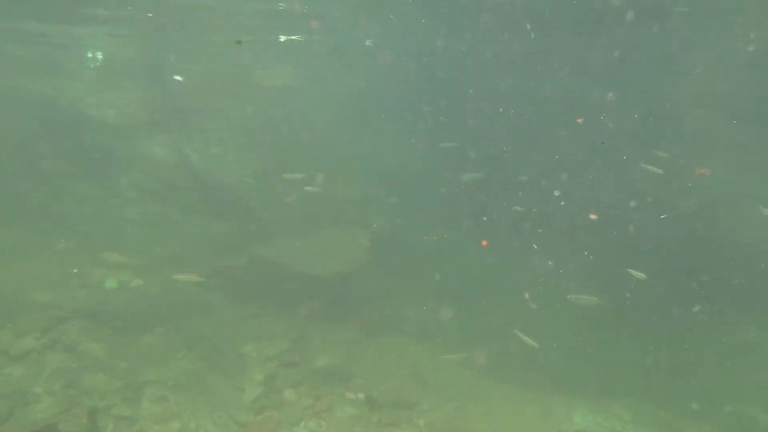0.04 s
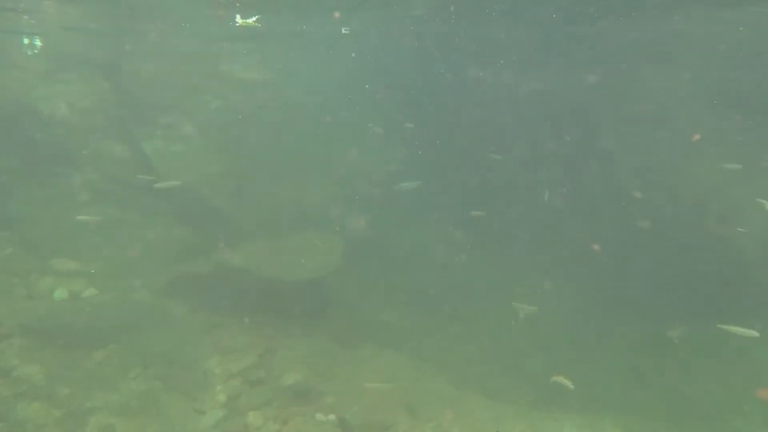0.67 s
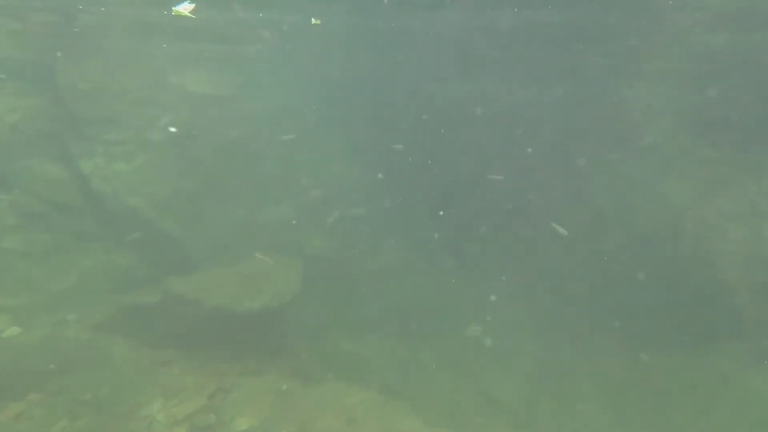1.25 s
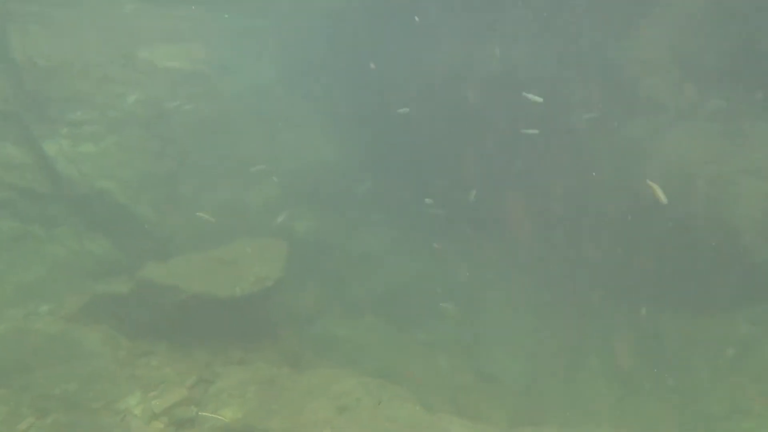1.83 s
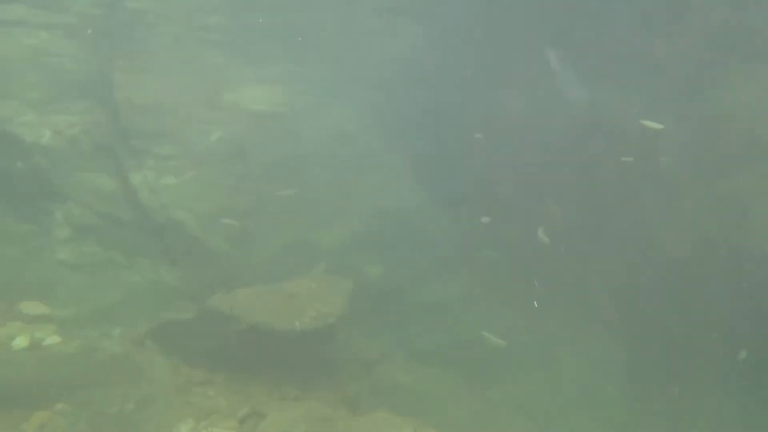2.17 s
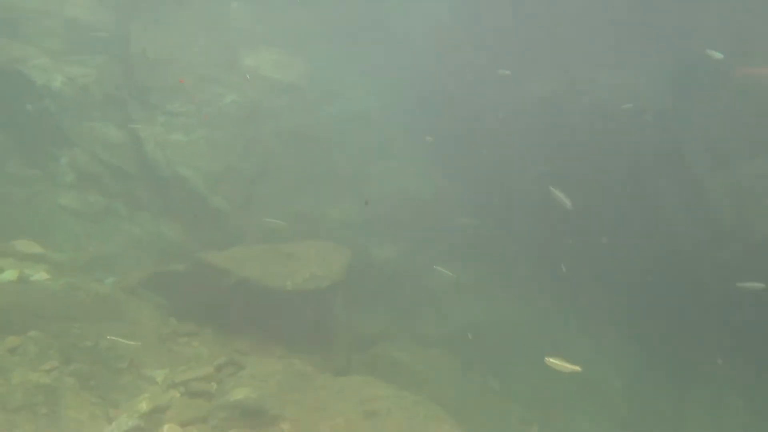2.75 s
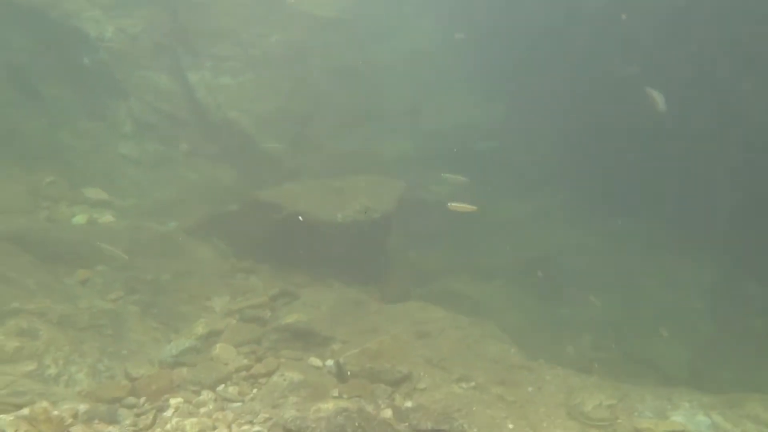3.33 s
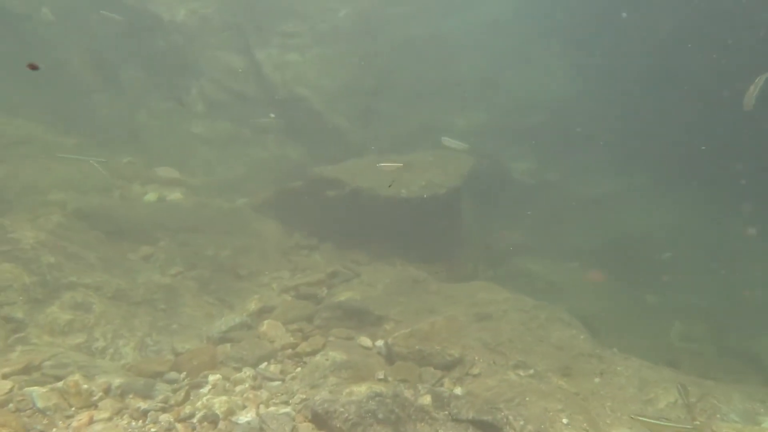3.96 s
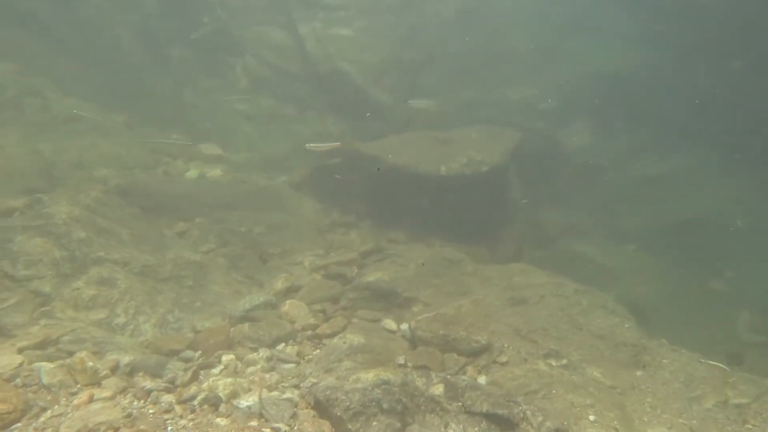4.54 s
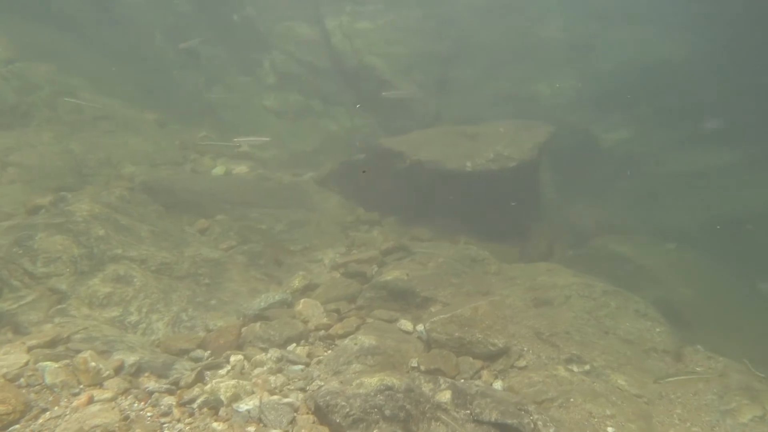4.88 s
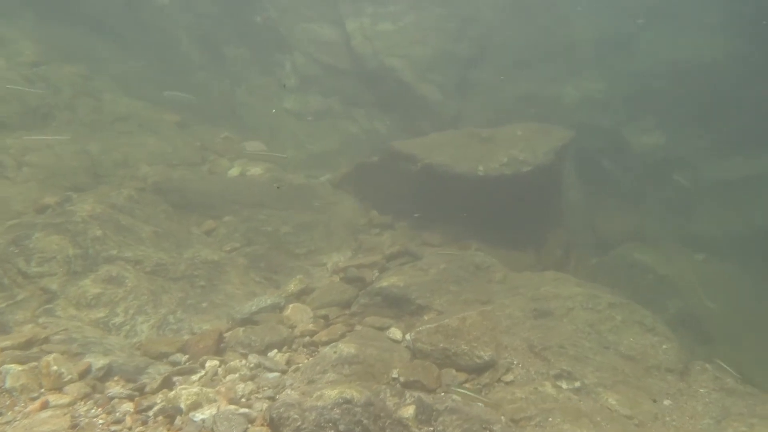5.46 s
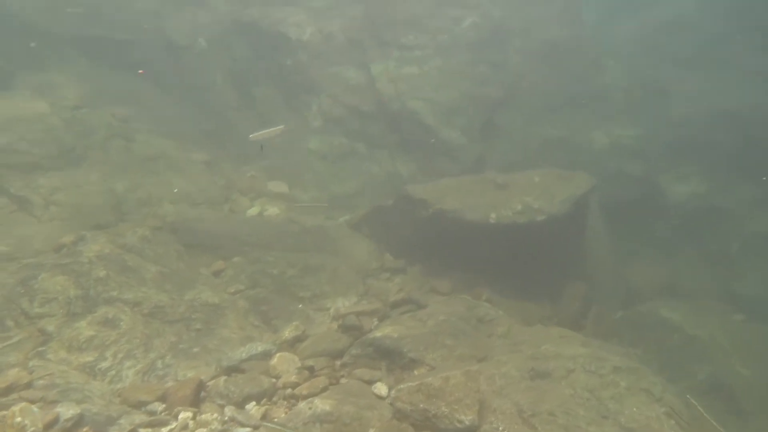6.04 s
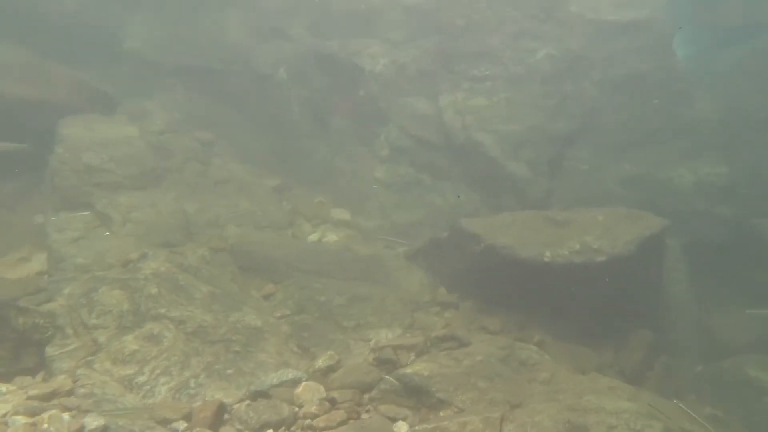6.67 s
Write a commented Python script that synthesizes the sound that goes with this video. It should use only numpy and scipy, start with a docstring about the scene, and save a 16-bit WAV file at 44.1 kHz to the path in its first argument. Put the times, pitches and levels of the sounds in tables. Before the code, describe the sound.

Low underwater rush of a stream, heard through a camera's shell, with scraping, small gurgles and a few sharp pebble knocks.

```python
"""A camera in a waterproof housing moves over a stream bed, heard mostly through its hollow shell.
From the start the current rumbles, grit and the grip rub, sand hisses. Within 1 s come scuffs, gurgles,
bumps, pebble knocks, grit ticks and a short ringing tone. Pebbles hit hard at 1.95 and 2.8 s; the current
peaks at 2.4 and 2.9 s. A knock at 3.05 s sets the mount humming. Rubbing strokes and lighter knocks
follow, then a last cluster of hard knocks near 6.4 s."""
import sys
import numpy as np
from scipy import signal
from scipy.fft import rfft, irfft, next_fast_len
from scipy.io import wavfile

SR = 44100
rng = np.random.default_rng(int(sys.argv[2]) if len(sys.argv) > 2 else 0)


def unload_wav(signal):
    """Save mono or channel-first audio to the path in sys.argv[1] as 16-bit WAV at rate SR, clipped to [-1, 1]."""
    wavfile.write(
        sys.argv[1],
        SR,
        np.round(np.clip(np.atleast_2d(signal).T, -1, 1) * 32767).astype(np.int16),
    )


N = 295911
TIME = np.arange(N) / SR

# shell resonances, opposite signs in antiphase: pitch_hz, width_hz, left_gain, right_gain
SHELL_MODES = [(258, 328, -0.21, 0.058), (317.5, 136, 0.2, 0.22), (373, 68, 0.3, -0.22),
               (437.8, 44.6, -1.13, 0.41), (445.2, 63, 0.7, 0.029), (580, 241, 0.12, 0.18),
               (768.7, 155.6, 0.3, 0.66), (794, 222, 0.32, -0.9), (864, 49, 0.2, -0.17),
               (1033.4, 132, 0.6, -0.14), (1051, 243.5, -0.5, -0.07), (1441, 45, 0.083, -0.17),
               (1413, 120, -0.028, -0.01), (2022, 198, -0.061, -0.098), (2297, 470, -0.1526, -0.0236),
               (2376, 342, 0.123, 0.032), (3324, 390, -0.0374, -0.0045), (4075, 1400, -0.0099, 0.0025),
               (5530, 1360, -0.0142, -0.0016), (6700, 660, -0.009, 0.0014), (7300, 470, -0.0039, -0.0046),
               (9000, 3500, 0.0013, 0.0063), (9960, 900, -0.008, -0.006)]
# flow strength, rising as the housing turns into the current: time_s, relative_db
FLOW_CURVE = [(0.05, -49), (0.33, -40.5), (0.55, -39.5), (1.1, -48), (1.28, -41.5), (1.7, -41), (2.05, -38),
              (2.42, -23.5), (2.68, -31.5), (2.92, -22), (3.25, -39.5), (3.6, -33), (4.4, -44.5),
              (4.75, -41), (5.1, -45.5), (5.4, -39.5), (5.8, -42.5), (6.25, -47), (6.53, -36), (6.68, -35)]
# large-eddy spectrum: frequency_hz, relative_density_db
SWELL_SPECTRUM = [(6, -5), (14, 7.5), (22, 2.5), (33, -5), (48, -11.5), (70, -25.5), (110, -31), (300, -69)]
# small-eddy spectrum: frequency_hz, relative_density_db
FLUTTER_SPECTRUM = [(30, -17), (60, 6.5), (110, 1), (170, -1.5), (300, -10), (900, -63)]
# rubbing strokes, before stick-slip: start_s, length_s, grind_db, drag_re_grind_db, hardness_db
RUB_STROKES = [(0.2, 0.06, -46, -22, 18), (0.262, 0.14, -37, -10, -10), (0.653, 0.078, -43.5, -5.5, -19),
               (0.816, 0.16, -41.5, -9, -11), (1.093, 0.079, -39, -12, -0.5), (1.333, 0.07, -40, -32, -8),
               (1.525, 0.43, -40, -11, 2), (2.024, 0.041, -36, -5, -0.5), (2.404, 0.0098, -16.5, -4, -2.5),
               (2.46, 0.03, -23, -10, 1.5), (2.496, 0.083, -31, -12, -1), (2.603, 0.23, -39, -19, 0),
               (2.776, 0.0091, -31.5, -12, 3), (2.892, 0.092, -50.5, 5, 11), (3.045, 0.19, -37, -5.5, 4),
               (3.284, 0.034, -34.5, -7, 9.5), (3.36, 0.15, -33, -13, 8), (3.572, 0.25, -41, -5, 3.5),
               (3.771, 0.042, -26, -6.5, -5), (3.826, 0.052, -31, -11.5, -5), (3.91, 0.1, -38, -6.5, 3),
               (4.028, 0.23, -34, -6, -1.5), (4.471, 0.15, -42.5, -5, 13), (5.056, 0.23, -41.5, -9.5, -3),
               (5.272, .23, -33.5, -7.5, -4.5), (5.547, 0.25, -34, -9.5, -1),
               (5.725, 0.16, -34.5, -0.5, 0.5), (5.911, 0.35, -34, -7.5, 5), (6.372, 0.038, -30.5, -2.5, 1),
               (6.417, 0.048, -21.5, -5, -3.5), (6.543, 0.051, -30.5, -3.5, 2.5)]
# drifting sand: peak_s, peak_db, rise_s, fall_s
SAND_PLUMES = [(0.7, -59.5, 0.025, 0.13), (1.38, -58.5, 0.19, 0.055), (1.9, -45.5, 0.21, 0.037),
               (2.07, -50.5, 0.13, 0.053), (2.6, -52, 0.087, 0.25), (2.86, -54.5, 0.072, 0.15),
               (3.06, -58.5, .06, 0.18), (4.52, -48.5, 0.0099, 0.018), (6.03, -66, 0.09, 0.14),
               (6.42, -57, 0.068, 0.21)]
# grit clusters brushing the shell: start_s, energy_db
GRIT_SCUFFS = [(0.193, -19), (0.253, -11.5), (0.268, -16), (0.307, -14), (0.329, -15), (0.363, -21),
               (0.426, -19.5), (0.85, -15.5), (0.878, -13), (1.139, -13.5), (1.157, -12), (1.539, -12),
               (1.562, -13), (1.611, -7), (1.631, -10), (1.712, -18), (1.752, -8.5), (1.776, -14),
               (1.928, -11), (3.13, -15), (3.184, -13.5), (3.464, -27), (3.849, -11), (3.877, -10),
               (4.234, -12.5), (4.516, -9.5), (4.696, -17), (5.84, -14), (5.861, -13), (5.926, -14),
               (6.156, -17), (6.432, -8.5)]
# gurgles beside the housing: start_s, energy_db, pitch_hz
WATER_GURGLES = [(0.195, -8.5, 870), (0.213, -15, 816), (0.266, -9, 780), (0.281, -11, 810),
                 (0.294, -1.5, 844), (0.308, -1, 740), (0.319, -10, 810), (0.3317, -0.5, 865),
                 (0.349, -8, 810), (0.364, -11, 760), (0.39, -12, 826), (0.40, -2, 740), (0.752, -9.5, 780),
                 (0.8156, -7.5, 720), (0.9545, -2.5, 800), (1.052, -10, 765), (1.0666, -4, 764),
                 (1.091, -11, 740), (1.131, -17, 830), (1.183, -7, 820), (1.262, -5.5, 820),
                 (1.315, -10, 815), (1.3454, -9, 800), (1.364, -11, 765), (1.39, -7, 830),
                 (1.532, -18, 760), (1.58, -7, 845), (1.62, -2, 830), (1.644, -5.5, 830), (1.701, -5, 870),
                 (1.753, -8, 890), (1.769, -5, 774), (1.787, -9, 735), (1.8055, -3.5, 820),
                 (1.831, -9, 800), (2.467, 7.5, 850), (2.476, 7, 790), (4.3845, -6.5, 820),
                 (4.396, -7.5, 736), (6.487, 4.5, 740)]
# soft shoves on the housing: start_s, level_db, pitch_hz, t60_s, right_gain
HOUSING_BUMPS = [(.268, -24, 102, 0.036, 0.83), (.342, -18.5, 57, 0.11, 0.63),
                 (.57, -33.5, 109, 0.068, 0.9), (1.474, -30, 74, 0.058, 1), (1.682, -24.5, 55, 0.17, 0.7),
                 (1.9547, -18, 115, 0.03, 1), (1.995, -23, 65, .04, .8), (2.053, -11, 86, 0.024, 0.46),
                 (2.402, -14, 29.8, 0.25, 0.56), (2.824, -4.5, 41.4, 0.039, 0.69),
                 (2.925, -21, 102, 0.13, -0.78), (3.0505, 1, 75, 0.013, 0.42),
                 (3.066, -9.5, 139, 0.037, -0.37), (6.347, -19, 86.5, 0.044, 0.96)]
# pebble strikes: start_s, energy_db, centre_hz, width_octaves, scrape_gain, crack_db, crack_top_hz
PEBBLE_KNOCKS = [(0.424, -3, 700, 0.62, 0.05, -37, 3500), (1.6125, -4.5, 1410, 3.2, 0.1, -37, 8000),
                 (1.6995, -4, 1120, 1.5, 0.034, -17, 4000), (1.9235, 1.5, 3900, 1.2, 0.025, -7, 14000),
                 (1.9331, 9.5, 880, 0.63, 0.013, 1.5, 3500), (1.9543, 18, 654, 1.32, 0.026, 10.5, 11400),
                 (1.9605, 0, 760, .7, 0.018, -14, 2500), (2.0259, 0, 1330, 0.26, 0.084, -28, 3500),
                 (2.407, 4, 487, 3.7, 0.051, -15, 6950), (2.4261, -6, 2180, 1, 0.015, -26, 4500),
                 (2.4626, -3, 2310, 0.79, 0.013, -25, 4970), (2.692, -15, 3280, 0.4, 0.063, -29, 6000),
                 (2.7863, 7.5, 1000, 0.61, 0.037, -6, 6000), (2.7935, 19, 920, 0.68, 0.013, -20, 14000),
                 (2.7938, -4.5, 3760, 0.68, 0.07, -18, 14000), (2.7995, 10, 786, .8, .02, -27, 3500),
                 (2.825, -6, 600, 1.6, 0.038, -32, 8000), (3.049, 5, 220, 3.1, 0.011, -1.5, 2580),
                 (3.0696, 2, 200, 4.7, 0.034, -26, 2200), (3.329, -4.5, 1500, 1.8, 0.017, -27, 9000),
                 (3.3505, -1, 1280, 0.9, 0.029, -26, 6000), (3.415, 2.5, 1730, 0.56, 0.19, -19, 6960),
                 (3.8202, 0, 870, 1.1, 0.034, -28, 3000), (3.943, 0.5, 445, 4, 0.033, -19, 3000),
                 (4.503, -3.5, 1420, 0.81, 0.19, -30, 5950), (4.698, -2, 610, 0.52, 0.046, -31, 3500),
                 (4.753, -2.5, 624, 0.8, 0.066, -37, 3000), (4.907, -4.5, 615, 0.54, 0.16, -42, 3000),
                 (5.628, -1.5, 1040, .6, 0.056, -45, 3500), (5.736, -1, 650, 4.2, 0.059, -37, 6000),
                 (5.758, -3, 1000, 2, 0.09, -35, 3500), (5.9401, -15.5, 2600, 0.92, 0.28, -25.5, 9600),
                 (6.029, -15, 2900, 1.4, 0.16, -26, 8000), (6.555, -16, 2500, 0.92, .4, -25, 8000),
                 (6.571, -17, 3280, .6, .2, -28, 7500), (6.347, -3, 420, 1.4, 0.026, -12.5, 2500),
                 (6.402, 10, 688, .8, 0.041, -10, 2500), (6.4075, 11.5, 675, 0.6, 0.022, -16, 2500),
                 (6.474, 10.5, 630, 0.33, 0.27, -7, 2500)]
# single grains hitting the shell: start_s, energy_db, centre_hz
GRIT_TICKS = [(0.648, -29, 7000), (2.5423, -14.5, 7350), (2.55, -4, 7600), (2.6924, -5.5, 5440),
              (2.724, -15.5, 5000), (2.9482, -16.5, 5650), (3.027, -26, 7800), (3.0648, -20, 7000),
              (3.25, -31, 7060)]
# short ringing tones of the shell or of bubbles: start_s, level_db, pitch_hz, t60_s, right_gain
SHORT_RINGS = [(0.9985, -47.5, 5370, 0.037, 0.76), (1.9245, -16, 1940, 0.023, 0.82),
               (1.9548, -15, 2030, 0.02, 0.48), (1.9565, -16.5, 351, 0.045, 0.99),
               (1.957, -18, 688, 0.088, 0.89), (1.957, -31, 438, 0.13, 0.7), (2.0257, -24, 1403, 0.055, 1),
               (2.795, -11, 738, 0.039, 0.97), (2.794, -23, 1460, 0.04, 0.55),
               (2.797, -18, 440, 0.055, -0.61), (2.826, -13, 433, 0.1, -0.72),
               (3.355, -33, 403, 0.31, 0.48), (3.51, -29, 382, 0.07, 0.55), (3.942, -25, 320, 0.04, 0.66)]
# mount resonance: start_s, level_db, pitch_hz, t60_s, right_gain
MOUNT_RINGS = [(3.049, -22, 255.4, 0.56, -1.47)]

DRAG_TOP_HZ, HOLLOW_TOP_HZ, HARD_TOP_HZ, SCRATCH_TOP_HZ = 580, 1007, 1302, 4070


def from_db(db):
    """Decibels to gain."""
    return 10 ** (np.asarray(db) / 20)


def unit_rms(x):
    """Scale to unit power."""
    return x / np.sqrt(np.mean(x ** 2) + 1e-20)


def cut(x, kind, hz, order):
    """Butterworth high- or low-pass."""
    sos = signal.butter(order, np.clip(hz, 10, .45 * SR), kind, fs=SR, output="sos")
    return signal.sosfilt(sos, x)


def band(x, low_hz, high_hz, order=6):
    """Steep band-pass."""
    return cut(cut(x, "high", low_hz, order), "low", high_hz, order)


def drift(rate_hz):
    """Smooth random wander, unit RMS."""
    pole = np.exp(-2 * np.pi * rate_hz / SR)
    return unit_rms(signal.lfilter([1], [1, -2 * pole, pole * pole], rng.standard_normal(N + SR))[SR:])


def coloured_noise(spectrum):
    """Noise with the given spectrum, unit RMS."""
    hz, level_db = np.transpose(spectrum)
    size = next_fast_len(N)
    bins_hz = np.maximum(np.fft.rfftfreq(size, 1 / SR), 1)
    colour = from_db(np.interp(np.log(bins_hz), np.log(hz), level_db, right=-np.inf))
    return unit_rms(irfft(rfft(rng.standard_normal(size)) * colour, size)[:N])


def envelope(start_s, end_s, attack_s, release_s):
    """Exponential rise to start_s, hold to end_s, exponential fall."""
    return np.exp(-np.maximum(start_s - TIME, 0) / attack_s - np.maximum(TIME - end_s, 0) / release_s)


def current(swell_gain_db=5.0, flutter_db=-53.5, flutter_growth=0.26, rocking_db=-2, gust_db=0.5):
    """Large eddies press on both microphones alike; small ones flutter and rock the housing."""
    flow_db = np.interp(TIME, *np.transpose(FLOW_CURVE))
    swell = from_db(flow_db + swell_gain_db) * coloured_noise(SWELL_SPECTRUM)
    flutter = coloured_noise(FLUTTER_SPECTRUM)
    rocking = cut(coloured_noise(FLUTTER_SPECTRUM), "high", 120, order=2) * [[1], [-1]]
    eddy_db = flutter_db + flutter_growth * (flow_db - np.median(flow_db)) + gust_db * drift(rate_hz=7)
    return swell + from_db(eddy_db) * (flutter + from_db(rocking_db) * rocking)


def shell_response(size=4096, tail_db=-17, tail_t60_s=0.045, tail_low_hz=1300):
    """Stereo impulse response of the shell; many weak upper modes leave a short tail."""
    push, modes = signal.unit_impulse(size) + 1e-18, 0
    for hz, width_hz, left, right in SHELL_MODES:
        r = np.exp(-np.pi * abs(width_hz) / SR)
        mode = signal.lfilter([1, 0, -1], [1, -2 * r * np.cos(2 * np.pi * hz / SR), r * r], push)
        modes = modes + np.outer([left, right], mode * (1 - r * r) / 2)
    tail = rng.standard_normal((2, size)) * from_db(-60 * TIME[:size] / tail_t60_s)
    tail = cut(unit_rms(tail) / np.sqrt(size), "high", tail_low_hz, order=3)
    return modes + from_db(tail_db) * signal.fftconvolve(modes, tail, axes=1)[:, :size]


def through(shell, force):
    """A running force heard through the shell, unit RMS."""
    return unit_rms(signal.oaconvolve(force, shell, axes=1)[:, :N])


def friction(slips_per_s, spread_db, smooth_gain, clump_db, channels=1):
    """Tiny uneven slips over smooth friction, in clumps; unit RMS."""
    shape = (channels, N)
    sizes = from_db(spread_db * np.minimum(rng.exponential(1, shape), 4)) * rng.choice([-1, 1], shape)
    slips = unit_rms(sizes * (rng.random(shape) < slips_per_s / SR))
    force = slips + smooth_gain * rng.standard_normal(shape)
    return unit_rms(force * from_db(clump_db * drift(rate_hz=31)))


def stroke_gains(scratch_re_grind_db=-16, scratch_per_hardness=0.74):
    """Gains of drag, hollow grind, hard grind and scratch; hardness favours the upper two."""
    power = np.zeros((4, N))
    for start_s, length_s, grind_db, drag_db, hardness_db in RUB_STROKES:
        hardness = from_db(hardness_db)
        drag = from_db(grind_db + drag_db)
        hollow = from_db(grind_db) / np.sqrt(1 + hardness ** 2)
        scratch = from_db(grind_db + scratch_re_grind_db + scratch_per_hardness * hardness_db)
        stroke = envelope(start_s, start_s + length_s, attack_s=0.0088, release_s=0.027)
        active = stroke > 1e-3
        power[:, active] += np.outer([drag, hollow, hardness * hollow, scratch], stroke[active]) ** 2
    return np.sqrt(power)


def stick_slip(rate_hz=17, depth_db=1.5, scratch_depth_db=2):
    """Rubbing sticks and slips: uneven gains for its four bands, scratch most of all."""
    grip_db = depth_db * drift(rate_hz)
    return from_db([grip_db] * 3 + [grip_db + scratch_depth_db * drift(2 * rate_hz)])


def rubbing(shell, strokes, rest_db=(-51, -47, -44, -52)):
    """Slips drive the shell in four bands: strokes over a light, constant rub."""
    slips = friction(slips_per_s=900, spread_db=2.0, smooth_gain=0.38, clump_db=0.5)
    per_mic = friction(slips_per_s=2000, spread_db=3.0, smooth_gain=0.56, clump_db=-1.0, channels=2)
    coarse_grit = friction(slips_per_s=170, spread_db=1.0, smooth_gain=1.0, clump_db=0.5)
    drag = cut(slips + 0.29 * per_mic, "low", DRAG_TOP_HZ, order=6)
    drag = cut(drag, "high", 83, order=1)
    hollow = band(coarse_grit + 0.53 * per_mic, DRAG_TOP_HZ, HOLLOW_TOP_HZ)
    hard = band(slips + 0.83 * per_mic, HOLLOW_TOP_HZ, HARD_TOP_HZ)
    scratch = band(slips + 0.57 * per_mic, HARD_TOP_HZ, SCRATCH_TOP_HZ)
    bands = zip(from_db(rest_db), strokes, (drag, hollow, hard, scratch))
    return sum(np.hypot(rest, stroke) * through(shell, force) for rest, stroke, force in bands)


def sand(shell, scratch_gain, rest_db=-63, caught_db=-18, coarse_db=1):
    """Sand hisses on the shell, grainy in plumes or when caught in a stroke; plumes add coarse grains."""
    plumes = np.sqrt(sum((from_db(peak_db) * envelope(peak_s, peak_s, rise_s, fall_s)) ** 2
                         for peak_s, peak_db, rise_s, fall_s in SAND_PLUMES))
    streaming = np.hypot(plumes, from_db(caught_db) * scratch_gain)
    noise = cut(rng.standard_normal((2, N)), "high", SCRATCH_TOP_HZ, order=5)
    hiss = from_db(rest_db) * through(shell, noise) * from_db([[0.3], [0.8]])
    grit = friction(slips_per_s=2500, spread_db=2.0, smooth_gain=0.48, clump_db=2.5)
    fine = streaming * through(shell, cut(grit, "high", 5050, order=5)) * from_db([[-0.3], [1.2]])
    coarse = from_db(coarse_db) * plumes * through(shell, band(grit, 1900, SCRATCH_TOP_HZ))
    return hiss + fine + coarse


def self_noise(level_db=-58.5):
    """The microphones' own even hiss."""
    return from_db(level_db) * rng.standard_normal((2, N))


def contact(low_hz, high_hz, scrape_gain, push=0.42, scrape_at_1khz_s=0.0029, size=4096):
    """Band-limited force of one push and a brief scrape; softer contacts rise and fall more slowly."""
    rise_s = scrape_at_1khz_s * np.sqrt(1000 / high_hz)
    progress = TIME[:size] / rise_s
    scrape = scrape_gain * rng.standard_normal(size) * progress * np.exp(1 - progress)
    return band(push * signal.unit_impulse(size) + scrape, low_hz, high_hz, order=4)


def add_event(out, start_s, energy_db, shell, force):
    """Mix in a brief force heard through the shell, scaled to energy_db."""
    at = round(start_s * SR)
    sound = signal.fftconvolve(force[None], shell, axes=1)[:, :N - at]
    energy = np.mean(np.sum(sound ** 2, axis=1))
    out[:, at:at + sound.shape[1]] += from_db(energy_db) * sound / np.sqrt(energy)


def scuffs(shell):
    """A rush of tiny contacts briefly rings the shell's upper modes."""
    out = np.zeros((2, N))
    for start_s, energy_db in GRIT_SCUFFS:
        force = contact(low_hz=1690, high_hz=2700, scrape_gain=0.13, scrape_at_1khz_s=0.008)
        add_event(out, start_s, energy_db, shell, force)
    return out


def gurgles(shell, t60_s=0.025, rise_per_s=1.8, size=4096):
    """Bubbles beside the shell: short dying tones that rise a little."""
    out, age_s = np.zeros((2, N)), TIME[:size]
    for start_s, energy_db, hz in WATER_GURGLES:
        cycles = hz * age_s * (1 + rise_per_s * age_s / 2)
        tone = from_db(-60 * age_s / t60_s) * np.sin(2 * np.pi * cycles)
        add_event(out, start_s, energy_db, shell, tone)
    return out


def damped_sines(rows):
    """One dying sine per row, shared by the microphones."""
    out = np.zeros((2, N))
    for start_s, level_db, hz, t60_s, right_gain in rows:
        at = round(start_s * SR)
        age_s = TIME[:min(SR, N - at)]
        tone = from_db(level_db - 60 * age_s / t60_s) * np.sin(2 * np.pi * hz * age_s)
        out[:, at:at + len(tone)] += np.outer([1, right_gain], tone)
    return out


def bumps():
    """Soft bumps shove or rock the whole housing: low thuds."""
    return damped_sines(HOUSING_BUMPS)


def knocks(shell):
    """Each pebble knocks in a band set by its size and hardness, with a gritty crack on top."""
    out = np.zeros((2, N))
    for start_s, energy_db, centre_hz, octaves, scrape_gain, crack_db, crack_top_hz in PEBBLE_KNOCKS:
        edge_ratio = 2 ** (octaves / 2)
        low_hz, high_hz = centre_hz / edge_ratio, centre_hz * edge_ratio
        add_event(out, start_s, energy_db, shell, contact(low_hz, high_hz, scrape_gain))
        crack = contact(0.96 * high_hz, crack_top_hz, scrape_gain, push=0.11)
        add_event(out, start_s, crack_db, shell, cut(crack, "high", crack_top_hz / 4, order=1))
    return out


def ticks(shell, width_octaves=0.89, pan_left_db=0.5):
    """Single grains of grit tick on the shell."""
    out, edge_ratio = np.zeros((2, N)), 2 ** (width_octaves / 2)
    for start_s, energy_db, centre_hz in GRIT_TICKS:
        force = contact(centre_hz / edge_ratio, centre_hz * edge_ratio, scrape_gain=0.034)
        add_event(out, start_s, energy_db, shell, force)
    return out * from_db([[pan_left_db], [-pan_left_db]])


def short_rings():
    """Short ringing tones of the shell or of bubbles, mostly just after knocks."""
    return damped_sines(SHORT_RINGS)


def mount_hum():
    """The mount rings on after a hard knock."""
    return damped_sines(MOUNT_RINGS)


def scene():
    """Shell sounds and ringing over the rumble of the current."""
    shell = shell_response()
    strokes = stroke_gains() * stick_slip()
    on_shell = rubbing(shell, strokes) + sand(shell, scratch_gain=strokes[-1])
    on_shell += knocks(shell) + ticks(shell) + scuffs(shell) + gurgles(shell)
    return on_shell + self_noise() + current() + bumps() + short_rings() + mount_hum()


def record(dry, cutoff_hz=11150):
    """Overload at full scale, then a steep low-pass."""
    lowpass = signal.ellip(12, .2, 85, cutoff_hz, fs=SR, output="sos")
    return signal.sosfilt(lowpass, np.clip(dry, -1, 1))


dry = scene()
out = record(dry)
unload_wav(out)
```